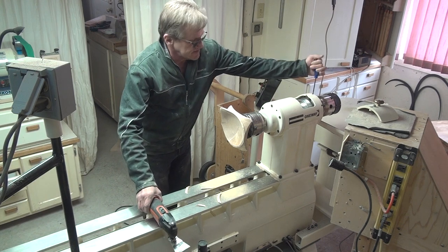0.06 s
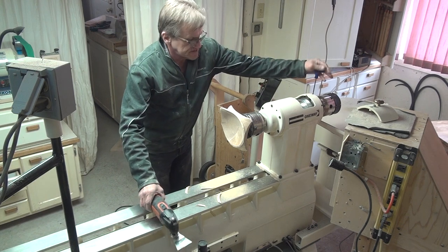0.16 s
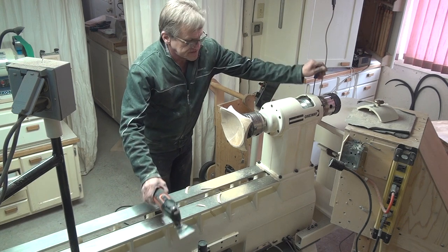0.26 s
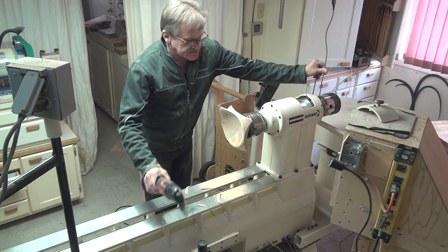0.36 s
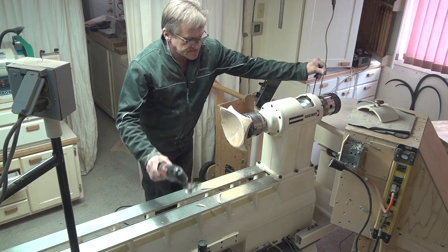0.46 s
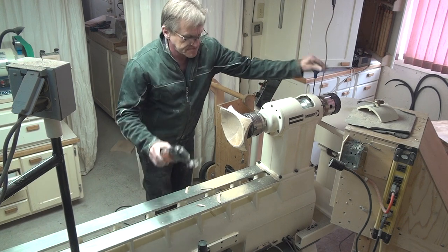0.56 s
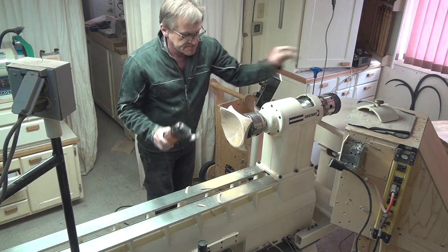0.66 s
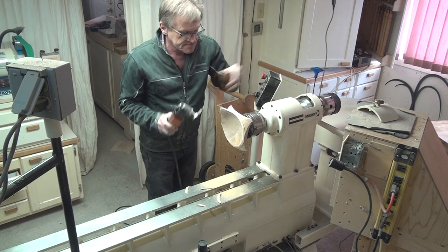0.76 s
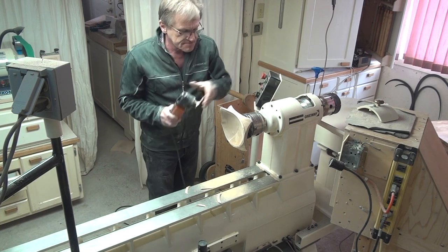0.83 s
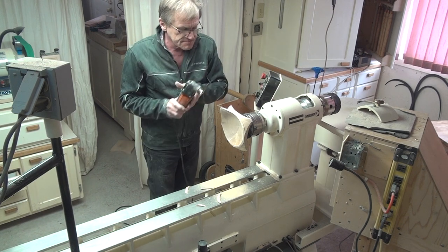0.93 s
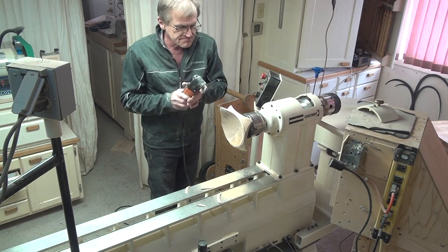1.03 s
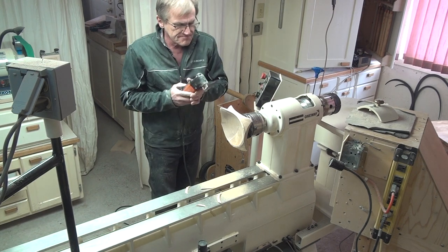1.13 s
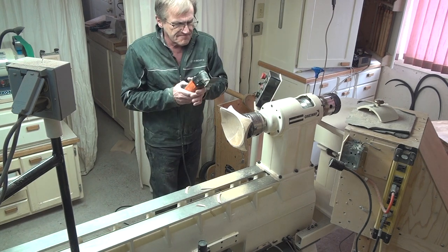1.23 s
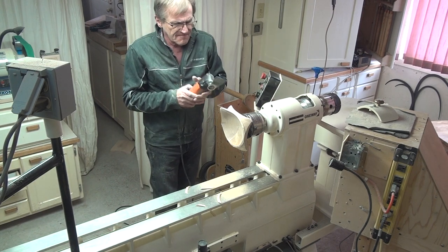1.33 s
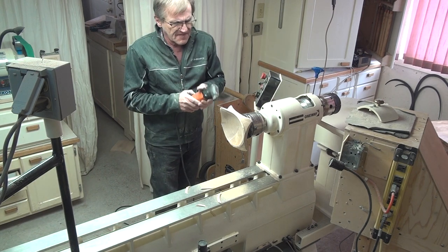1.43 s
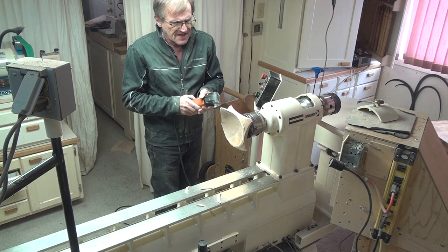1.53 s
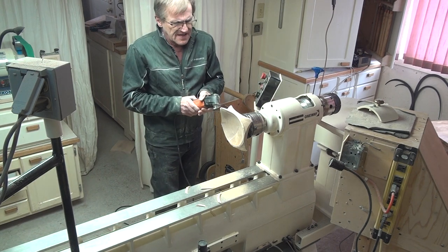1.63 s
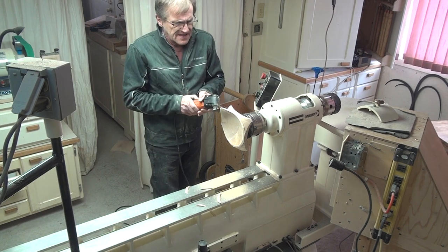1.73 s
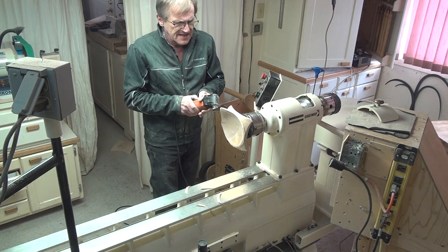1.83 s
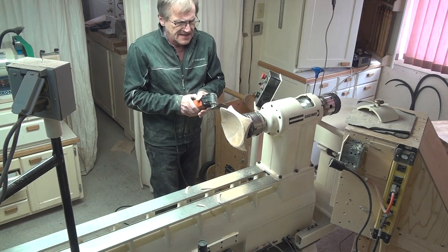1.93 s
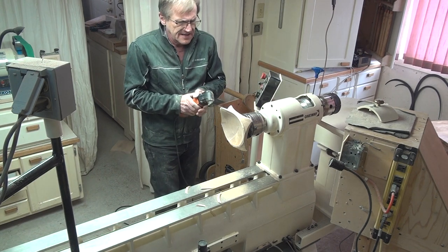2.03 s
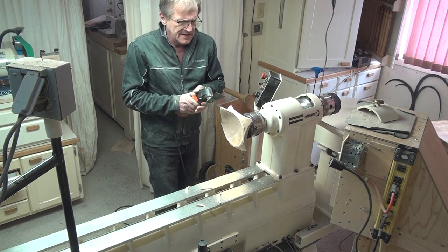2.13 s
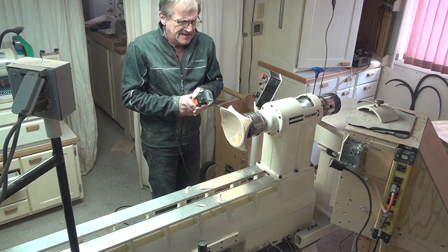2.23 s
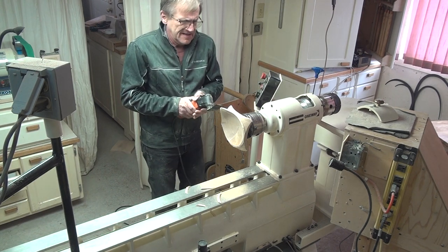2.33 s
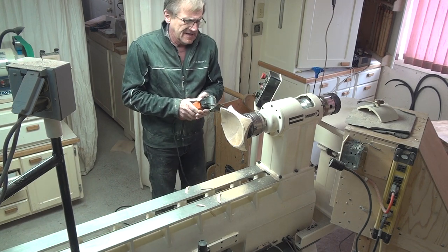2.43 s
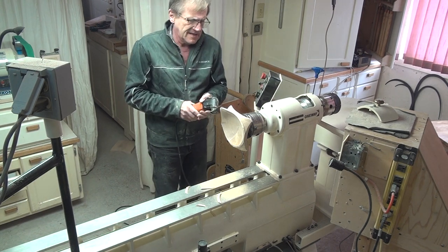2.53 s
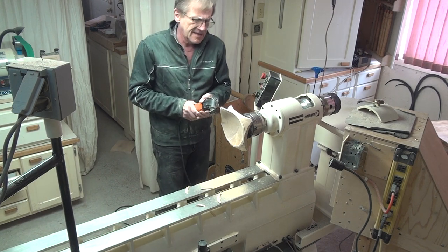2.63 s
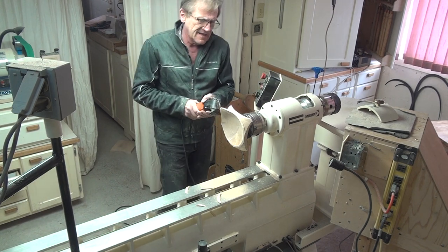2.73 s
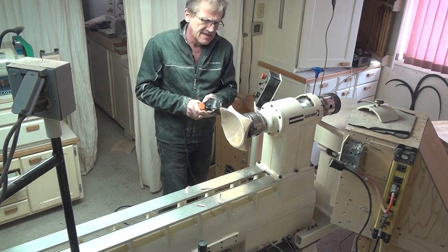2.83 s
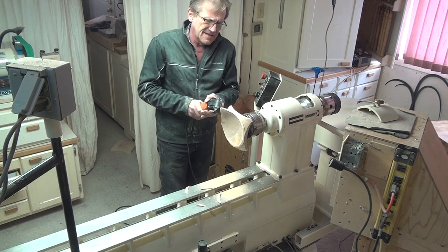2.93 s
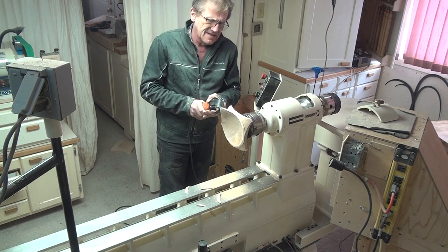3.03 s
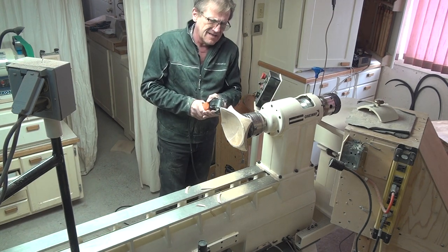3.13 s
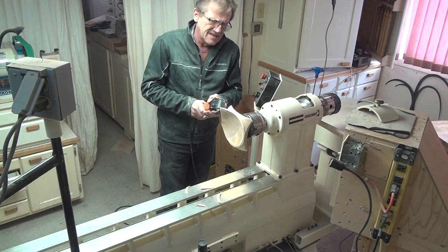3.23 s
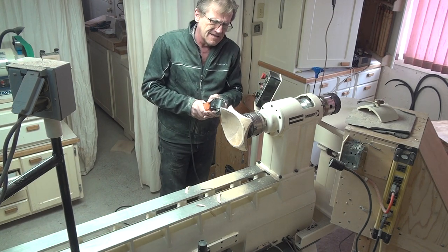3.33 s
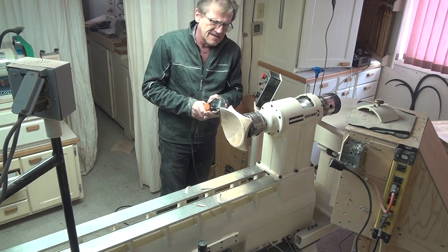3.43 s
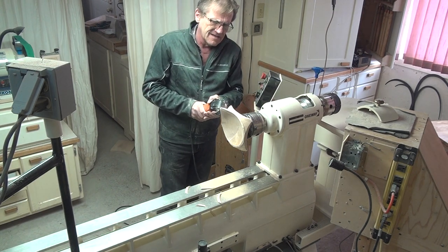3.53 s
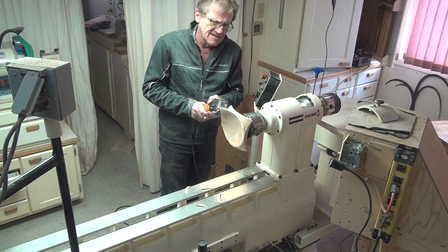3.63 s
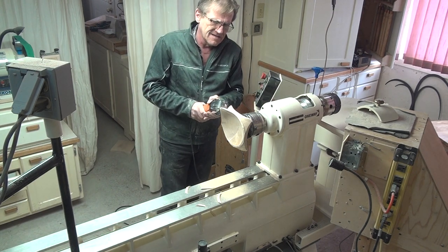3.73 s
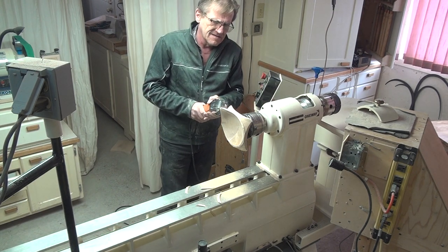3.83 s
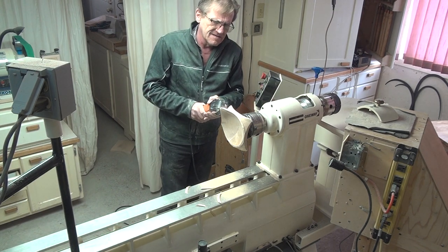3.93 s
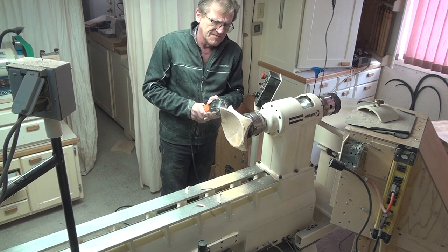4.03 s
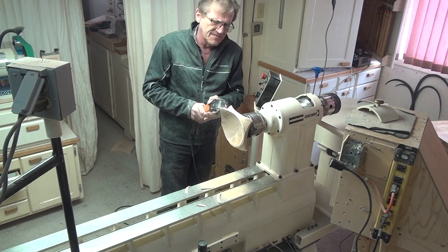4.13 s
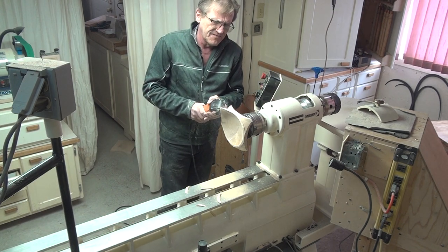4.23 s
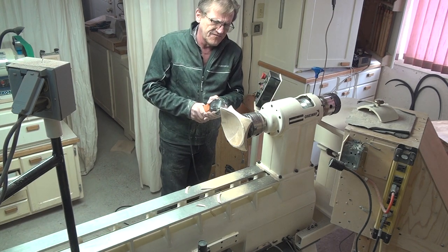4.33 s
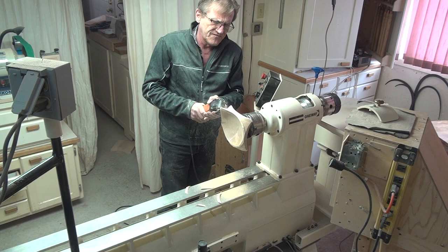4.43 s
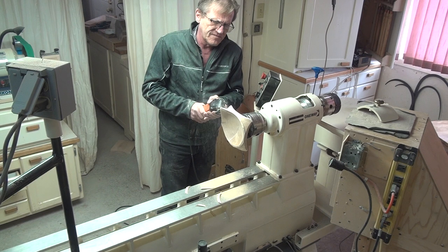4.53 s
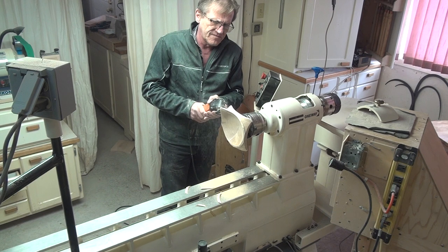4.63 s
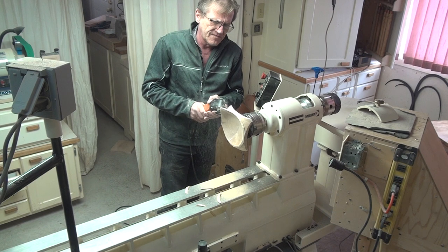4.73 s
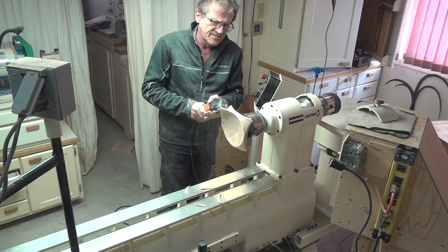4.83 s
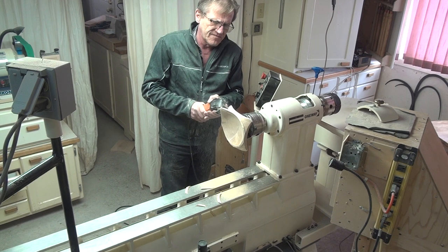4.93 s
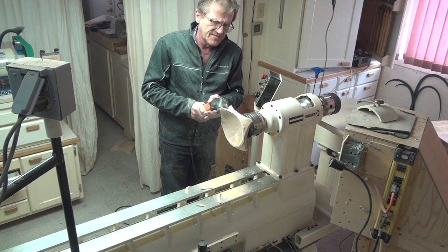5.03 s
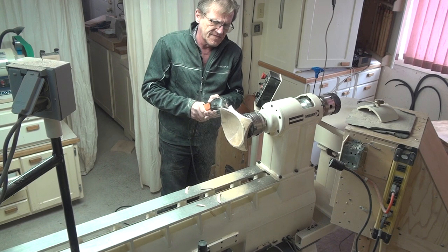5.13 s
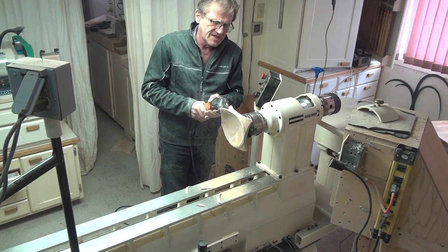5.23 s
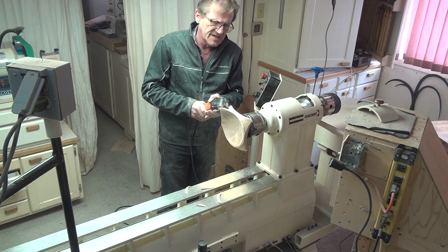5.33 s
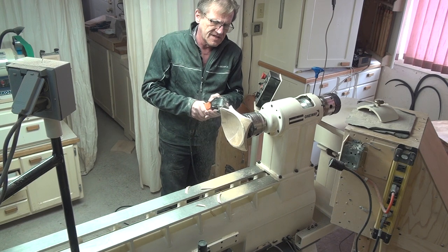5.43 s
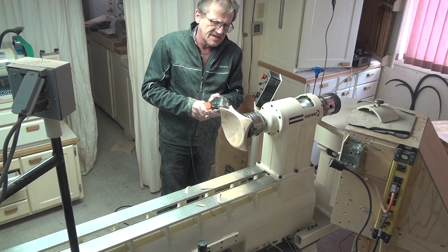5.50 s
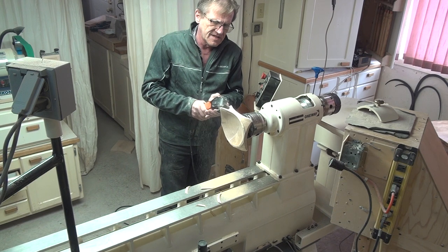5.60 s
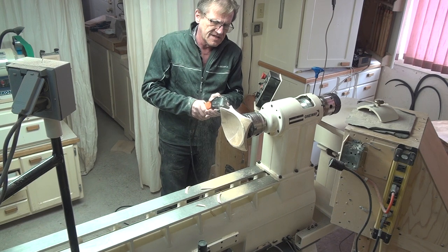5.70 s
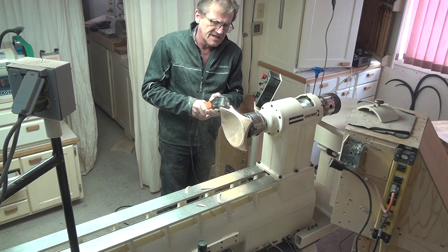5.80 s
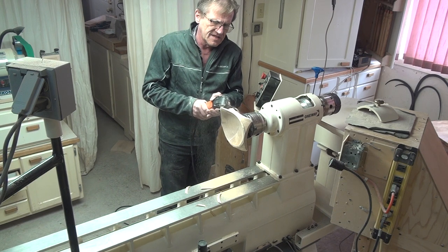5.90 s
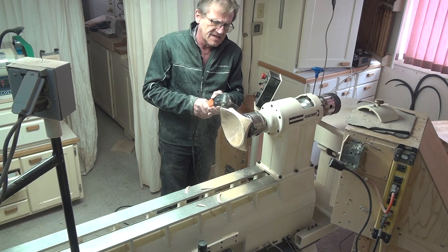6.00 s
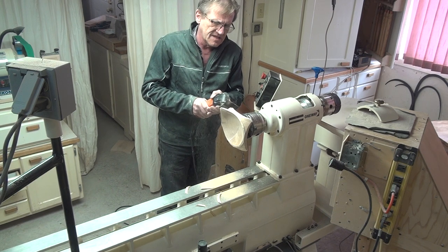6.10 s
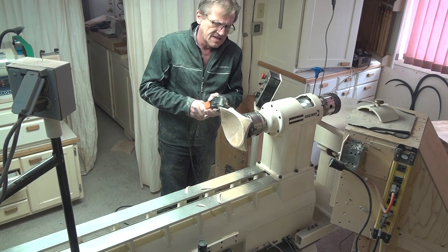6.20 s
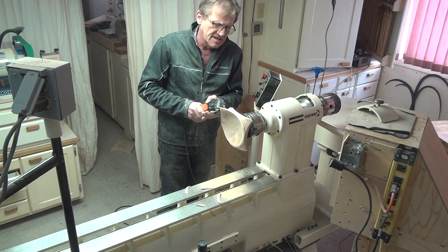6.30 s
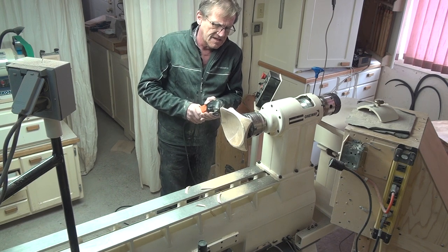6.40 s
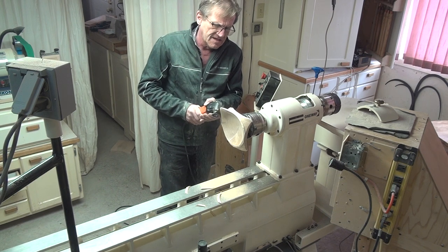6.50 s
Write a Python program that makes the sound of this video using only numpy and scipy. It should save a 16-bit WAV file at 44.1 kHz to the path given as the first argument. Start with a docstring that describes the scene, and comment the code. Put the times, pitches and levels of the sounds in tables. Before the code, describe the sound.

Soft cloth rustle and a few small taps lead to the sharp click of a power tool's switch. The motor starts with a low groan and rises into a rattling, whining buzz. Its oscillating blade bites thin wood with a rasp, slowing under load while the wood resonates, then comes loose with brief metallic zings and speeds back up. The microphone picks up the quick reflections of a small workshop.

```python
"""An oscillating multi-tool bites into a thin turned wooden horn in a small workshop.
First come room tone, cloth rustle and knocks as hands turn the tool and snap its switch on.
The motor groans and rattles up to speed; its reversing blade buzzes under a high rotor whine.
In the cut the teeth skid, the wood rings on a few multiples of the stroke rate and the load
slows the motor, until the blade comes free and the whine rises again."""
import sys
import numpy as np
from scipy import signal
from scipy.fft import rfft, irfft, next_fast_len
from scipy.io import wavfile
from scipy.ndimage import uniform_filter1d

SR = 44100
rng = np.random.default_rng(int(sys.argv[2]) if len(sys.argv) > 2 else 0)


def generate_wav(signal):
    """Clip the signal to [-1, 1] and save it as 16-bit WAV at the path in sys.argv[1]."""
    frames = np.transpose(np.atleast_2d(signal))
    scaled = np.clip(frames, -1, 1) * 32767
    pcm = np.round(scaled).astype(np.int16)
    wavfile.write(sys.argv[1], SR, pcm)


N = 289296
TIME = np.arange(N) / SR


def from_db(db):
    """Decibels to gain."""
    return 10 ** (np.asarray(db) / 20)


def rms_one(x):
    """Scale to rms 1."""
    return x / np.sqrt(np.mean(x ** 2) + 1e-20)


def crossfade(a, b, mix):
    """Linear blend from a (mix 0) to b (mix 1)."""
    return a * (1 - mix) + b * mix


def automation(points):
    """A breakpoint curve at every sample."""
    return np.interp(TIME, *np.transpose(points))


def plateau(start_s, length_s, edge_s):
    """Attack, hold and release, 0-1."""
    return np.clip(np.minimum(TIME - start_s, start_s + length_s - TIME) / edge_s + .5, 0, 1)


def at_hz(points, hz):
    """Read a table on a log-frequency axis."""
    f, value = np.transpose(points)
    return np.interp(np.log(np.maximum(hz, 1)), np.log(f), value)


def drift(rate):
    """Smooth random modulation of rms 1 that changes about `rate` times a second."""
    hop, settle = 40, 2000
    pole = np.exp(-2 * np.pi * rate * hop / SR)
    noise = rng.standard_normal(N // hop + settle + 2)
    slow = signal.lfilter([1], [1, -2 * pole, pole * pole], noise)[settle:]
    return np.interp(np.arange(N) / hop, np.arange(len(slow)), rms_one(slow))


def band(x, low_hz, high_hz, order=2):
    """Causal band-pass."""
    high_hz = min(max(high_hz, low_hz * 1.1), .48 * SR)
    sos = signal.butter(order, [low_hz, high_hz], "band", fs=SR, output="sos")
    return signal.sosfilt(sos, x + 1e-18)


def colour(x, eq):
    """Apply an EQ curve, then scale to rms 1."""
    size = next_fast_len(N)
    gain = from_db(at_hz(eq, np.fft.rfftfreq(size, 1 / SR)))
    return rms_one(irfft(rfft(x, size) * gain, size)[..., :N])


def resonance(x, hz, width_hz):
    """Two-pole resonance with gain 1 at its peak."""
    r = np.exp(-np.pi * width_hz / SR)
    poles = [1, -2 * r * np.cos(2 * np.pi * hz / SR), r * r]
    return signal.lfilter(np.array([1, 0, -1]) * (1 - r * r) / 2, poles, x)


def stereo(mid, side, side_db):
    """Mid and side to a narrow left-right image."""
    return mid + from_db(side_db) * side * np.array([[1], [-1]])


def partial(cycles, multiple, level_db, wander_db, side_db=-16):
    """A tone locked to a cycle count; it wavers as the tool moves through the room's standing waves."""
    phase = 2 * np.pi * (multiple * cycles + rng.random()) + 0.47 * drift(4.0)
    gain = np.sqrt(2) * from_db(level_db + wander_db * drift(5.75))
    return stereo(gain * np.sin(phase), gain * np.cos(phase) * drift(0.91), side_db)


# Workshop reverb: (frequency [Hz], decay time T60 [s])
REVERB_DECAY = [(200, 0.35), (1000, 0.25), (3000, 0.28), (8000, 0.26), (15000, 0.13)]


def room(x, wet_db):
    """Direct sound plus dense reflections from near benches and walls, dying faster in the treble."""
    t = np.arange(SR // 2) / SR
    edges_hz = np.geomspace(100, 17000, 9)
    tail = 0
    for low, high in zip(edges_hz, edges_hz[1:]):
        t60 = at_hz(REVERB_DECAY, np.sqrt(low * high))
        tail += band(rng.standard_normal((2, len(t))), low, high) * from_db(-60 * t / t60)
    tail *= np.clip(t / 0.0014, 0, 1)
    mid, side = tail / np.sqrt(np.sum(tail ** 2, axis=1, keepdims=True))
    wet = signal.fftconvolve(x[None], stereo(mid, side, side_db=-14), axes=1)[:, :N]
    return x + from_db(wet_db) * wet


# Colour of the air: (frequency [Hz], gain [dB])
AIR_EQ = [(15, -60), (25, -49), (123, -30), (149, -6), (180, -18.5), (285, -16), (734, -0.5), (840, -3.5),
          (988, -3), (1520, -0.5), (6380, -12.5), (11000, -19), (16000, -29)]
# Mains hum: (frequency [Hz], pre-fader level [dB])
HUM_TONES = [(120, -78.5), (179.8, -59), (240, -77), (300, -82), (480, -73.5), (840, -69.5)]
# Fader on air and hum, sinking from the switch snap on: (time [s], gain [dB])
ROOM_TONE_FADER = [(0, 3), (2.195, 2.5), (2.205, 0), (2.9, -15.5), (6.56, -23.5)]


def room_tone():
    """Air noise, the hum of mains equipment and a low rumble that swells while the tool is worked."""
    air = from_db(-53) * colour(stereo(*rng.standard_normal((2, N)), side_db=-8.5), AIR_EQ)
    working = plateau(start_s=2.83, length_s=2.9, edge_s=.2)
    rumble_gain = np.hypot(from_db(-78), working * from_db(-69))
    rumble = rms_one(band(stereo(*rng.standard_normal((2, N)), side_db=-23), 20, 200, order=1))
    hum = sum(np.sqrt(2) * from_db(db) * np.sin(2 * np.pi * (hz * TIME + rng.random()))
              for hz, db in HUM_TONES)
    return (air + hum) * from_db(automation(ROOM_TONE_FADER)) + rumble_gain * rumble


# Arm and hand moves: (peak time [s], half length [s], relative rustle [dB], relative sleeve hiss [dB])
HAND_MOVES = [(.03, .12, -50.5, -58), (0.256, 0.11, -56, -52), (0.77, 0.11, -44, -52),
              (1.066, 0.15, -39, -40.5), (1.428, 0.16, -41, -41.5), (1.754, 0.048, -44, -49),
              (2.008, 0.042, -40, -35.5), (2.098, 0.051, -45, -42)]
# Colour of rubbing cloth: (frequency [Hz], gain [dB])
CLOTH_EQ = [(120, -29), (200, -5), (254, -13), (473, -3), (548, -7), (821, -2.5), (1560, -8), (1740, -3),
            (3130, -1), (5940, -5.5), (9930, -7), (16000, -12)]
# Airy hiss of the sleeves: (frequency [Hz], gain [dB])
SLEEVE_EQ = [(3000, -16), (6000, -6), (8000, 0.5), (10500, 3), (13000, -3), (16000, -7.5)]


def rustle(grain_db=2.0, scuff_s=2.052, settle_s=2.202):
    """Cloth rubs in small clumps and a palm scuffs the housing, until the hands settle on the switch."""
    cloth_gain, sleeve_gain = from_db(-55), from_db(-53.5)   # floor between moves
    for peak_s, half_s, rustle_db, hiss_db in HAND_MOVES:
        move = np.exp(-.5 * ((TIME - peak_s) / half_s) ** 2)
        cloth_gain = np.hypot(cloth_gain, move * from_db(rustle_db))
        sleeve_gain = np.hypot(sleeve_gain, move * from_db(hiss_db))
    clumps = rng.standard_normal((3, N)) * from_db(grain_db * drift(85))
    cloth = cloth_gain * rms_one(band(colour(clumps[0], CLOTH_EQ), 180, 6150))
    sleeves = from_db(-3.5) * sleeve_gain * colour(clumps[1], SLEEVE_EQ)
    scuff_db = -29.5 - np.maximum(850 * (scuff_s - TIME), 142 * (TIME - scuff_s))   # fast in, slower out
    skin = colour(clumps[2], eq=[(250, 2.5), (1000, -1.5), (2800, -4.5), (6000, -17)])
    palm = from_db(scuff_db) * rms_one(band(skin, 390, 5400))
    moving = np.clip((settle_s - TIME) / .004, 0, 1)
    return room(from_db(-3.5) * (cloth + sleeves + palm), wet_db=-1.5) * moving


# Hand knocks and switch snaps:
# (time [s], relative level [dB], low cut [Hz], high cut [Hz], contact decay [s], shell send [dB])
HANDLING_HITS = [(0.09, -31.5, 500, 1500, 0.003, -26), (0.463, -35.5, 1500, 7000, 0.0043, -14),
                 (0.802, -26, 550, 1190, 0.0038, -22.5), (0.842, -31, 600, 1300, .005, -30),
                 (0.910, -22, 300, 1300, 0.0034, -30), (0.929, -24.5, 280, 700, .004, -30),
                 (1.069, -20, 281, 1270, 0.0034, -21), (1.072, -20, 2020, 3170, 0.0023, -19),
                 (1.090, -30, 2000, 3600, 0.0027, -24), (1.2854, -11, 1000, 3400, 0.0013, -13),
                 (1.2866, -16, 1100, 1500, .004, -30), (1.452, -26, 1500, 3550, 0.0035, -23),
                 (1.586, -21.5, 1380, 6900, 0.0014, -14), (1.666, -26, 890, 1500, 0.0024, -7),
                 (1.989, -11, 1280, 4500, 0.0036, -7.5), (2.082, -13.5, 1800, 4700, 0.0011, -13),
                 (2.2256, -20, 1800, 9000, 0.0022, -30), (2.2274, -6, 1770, 11000, 0.0016, -14),
                 (2.2283, -12, 2020, 3640, 0.0021, -26), (2.229, -21.5, 520, 1300, 0.0021, -19),
                 (3.225, -16.5, 600, 1340, 0.013, -33), (3.255, -21, 557, 1320, 0.013, -25)]
# Ring of the plastic shell: (frequency [Hz], relative level [dB], decay time T60 [s])
SHELL_MODES = [(1190, -21, 0.15), (1315, -14, 0.06), (1544, -6.5, 0.052), (2195, -2, 0.029),
               (2820, -5, 0.037), (3570, -14, .03), (4000, -9, 0.033), (4823, -31, .03)]


def knocks(ring_db=-8):
    """Short crunches, dull for a palm and bright for the switch, set the shell ringing."""
    out, t = np.zeros(N + SR), np.arange(SR // 5) / SR
    for time_s, level_db, low_hz, high_hz, contact_s, send_db in HANDLING_HITS:
        crunch = band(rng.standard_normal(len(t)) * np.exp(-t / contact_s), low_hz, high_hz, order=3)
        crunch /= np.sqrt(np.sum(crunch ** 2) / (0.00026 * SR))   # equal energy for every crunch
        shell = sum(from_db(db - 60 * t / t60) * np.sin(2 * np.pi * hz * t) * rng.choice([-1, 1])
                    for hz, db, t60 in SHELL_MODES)
        start = round(time_s * SR)
        out[start:start + len(t)] += from_db(level_db) * (crunch + from_db(send_db + ring_db) * shell)
    return room(band(out[:N], 190, 19000), wet_db=-1.5)   # the knocks carry nothing below about 190 Hz


# Drone of the motor's frame: (frequency [Hz], pre-fader level [dB])
FRAME_TONES = [(240, -73), (360, -66), (482, -55.5), (602, -59.5), (843, -51), (1082, -53)]
# Swell of the start-up groan: (time [s], gain [dB])
GROAN_FADER = [(2.3, -29), (2.38, -10), (2.45, -3.5), (2.53, 4), (2.8, 5.5), (2.95, -15), (3.1, -57)]


def groan(brush_hz=3000, brush_width_hz=440):
    """The soft start feeds the motor in mains-rate gulps: its frame drones while the brushes chafe."""
    swell_db = automation(GROAN_FADER)
    drone = sum(partial(TIME + 0.005 * drift(27) / np.sqrt(hz), hz, db + swell_db, wander_db=5.0)
                for hz, db in FRAME_TONES)
    brushes = resonance(rng.standard_normal(N), brush_hz, brush_width_hz)
    brushes = rms_one(resonance(brushes, brush_hz, brush_width_hz))
    return drone + from_db(swell_db - 49) * brushes


CONTACT_S, ENTRY_S = 3.226, 0.048   # the teeth touch the wood and take this long to enter
FREE_HZ, FULL_BUZZ_HZ = 282.2, 245   # stroke rates: with no load, and where the tones reach full level
# Pitch curve of the tool through spin-up, load and release: (time [s], stroke rate [Hz])
STROKE_RATE = [(2.8, 157.3), (2.9, 213.6), (2.95, 232.0), (3.03, 257.1), (3.11, 270.0), (3.2, 276.0),
               (3.35, 276.9), (3.61, 268.9), (3.75, 262.2), (4.77, 252.3), (5.11, 251.7), (5.75, 256.2),
               (5.93, 260.6), (6.0, 270.1), (6.11, 276.7), (6.56, 281.8)]


def motor(start_s=2.38, inertia_s=0.11, full_sag_hz=31.4, full_surge_hz_per_s=454):
    """Speed, surge (how hard it picks up) and bite (0-1, speed lost to the wood and not being regained)."""
    speed = automation([(start_s, 0)] + list(STROKE_RATE))
    pickup = uniform_filter1d(np.gradient(speed) * SR, size=5200)
    entered = np.clip((TIME - CONTACT_S) / ENTRY_S, 0, 1)
    bite = entered * np.clip((FREE_HZ - speed - inertia_s * pickup) / full_sag_hz, 0, 1)
    shudder = 0.37 * np.exp(-((speed - 179) / 57) ** 2)   # the body shakes on the way through 179 Hz
    surge = np.maximum(pickup / full_surge_hz_per_s, 0) + shudder
    return speed, surge, bite


def decades_below(speed, full_hz):
    """How far the speed is under a given rate: log ratio, at most 0."""
    return np.log10(np.clip(speed / full_hz, .01, 1))


# Honk of the housing: (frequency [Hz], bandwidth [Hz], gain [dB])
HOUSING_MODES = [(1300, 150, -28), (3270, 160, -12), (4050, 210, -2)]
# Rattle colour during spin-up: (frequency [Hz], gain [dB])
SPIN_UP_EQ = [(100, -49), (250, -34), (400, -23), (600, -12.5), (900, -7.5), (1400, 1.5), (2200, 0.5),
              (3000, 0.5), (4200, -6), (6000, -10.5), (8500, -22), (11500, -21), (14000, -36.0),
              (16000, -40.0)]
# Colour of the hiss, and of the rattle at speed: (frequency [Hz], gain [dB])
RUNNING_EQ = [(100, -46), (250, -27.5), (400, -24), (600, -11), (900, -6.5), (1400, -5), (2200, -2),
              (3000, 2), (4200, -6.0), (6000, -15), (8500, -17), (11500, -15.5), (14000, -28.5),
              (16000, -31)]


def rattle(strokes, speed, surge, bite, sharpness=0.89, uneven_db=3.5):
    """At each reversal the drive knocks and the teeth scrape: bursts of noise through the housing."""
    # The noise grows with speed and torque; the wood damps it.
    decades = decades_below(speed, FREE_HZ)
    body_db = -38 + 18 * decades + 9 * surge - 7 * bite + .5 * drift(12)
    hiss_db = -44 + 23 * decades + 6.5 * surge - 3.5 * bite + .5 * drift(12)
    for start_s, length_s, _, body_boost_db, hiss_boost_db in SKID_CUES:
        skidding = plateau(start_s, length_s, SKID_EDGE_S)
        body_db += body_boost_db * skidding
        hiss_db += hiss_boost_db * skidding
    pulses = np.exp(sharpness * np.cos(2 * np.pi * strokes) + .5 * np.cos(4 * np.pi * strokes))
    gate = pulses * from_db(uneven_db * drift(120)) * (speed > 0)
    bursts = gate * rng.standard_normal(N)
    bursts += sum(from_db(db) * resonance(bursts, hz, width) for hz, width, db in HOUSING_MODES)
    at_speed = np.clip((speed - 200) / 55, 0, 1)
    clatter = crossfade(colour(bursts, SPIN_UP_EQ), colour(bursts, RUNNING_EQ), at_speed)
    body = from_db(body_db) * rms_one(band(clatter, 110, 6200, order=3))
    scrape = colour(gate * rng.standard_normal(N), RUNNING_EQ)
    hiss = from_db(hiss_db) * rms_one(band(scrape, 4960, 15400, order=3))
    return room(body + hiss, wet_db=4.5)


# Buzz spectrum, read at whole orders: (order [x stroke rate], free gain [dB], cutting gain [dB])
BUZZ_SPECTRUM = [(0.99, -56.5, -59), (1.99, -67, -54.5), (3.05, -41, -37.5), (3.98, -42, -37),
                 (5.92, -39.5, -41.5), (7, -42.5, -34.5), (8, -34, -41), (10.3, -41, -35.5),
                 (11, -33.5, -31.5), (12.07, -33.5, -36), (14, -46, -43), (14.6, -43, -42.5),
                 (16, -56, -46), (17, -53, -41.5), (18, -49, -50.5), (18.3, -55, -40.5), (21.2, -50, -44.5),
                 (22.4, -55, -47.5), (24.6, -80, -52.5), (27, -57, -52), (29.4, -75.5, -47), (34, -64, -55),
                 (40.8, -59, -63), (50, -74, -82)]
# Bearing tones between the orders: (pitch [x stroke rate], free gain [dB], cutting gain [dB])
BEARING_TONES = [(5.43, -61, -62), (6.43, -47, -60), (7.43, -46, -55), (8.57, -42.5, -44), (9.43, -48, -59),
                 (11.43, -46, -47), (12.57, -47.5, -41.5)]
# The hand presses and eases: (time [s], gain [dB])
BUZZ_FADER = [(3.05, 0.5), (3.85, -1), (4.25, -2), (4.42, 1.5), (4.8, -3.5), (5.4, 2.5), (5.62, -1),
              (5.8, 1.5), (5.96, -3), (6.25, 1), (6.56, -0.5)]


def buzz(strokes, speed, bite, clamp_hz=255.3, scratch_hz=7700):
    """The reversing blade shakes out a stack of orders that shifts as it bites; the bearings sing along."""
    clamped = bite * np.clip((clamp_hz - speed) / 2.9, 0, 1)   # the cut grips the dragging blade
    bass_db = 2 - 10.5 * clamped + 45 * decades_below(speed, FULL_BUZZ_HZ)   # the bass comes in last
    fader_db = automation(BUZZ_FADER)
    # The teeth scratch on entering, less as the groove deepens.
    cut_s = TIME - CONTACT_S
    scratch_db = np.clip(cut_s / ENTRY_S, 0, 1) * np.maximum(18 - 13 * cut_s, -3.5)
    orders, free_db, cut_db = np.transpose(BUZZ_SPECTRUM)
    out = np.zeros((2, N))
    for k in range(1, 51):
        if k in RING_ORDERS + WHINE_ORDERS:
            continue
        order_db = crossfade(np.interp(k, orders, free_db), np.interp(k, orders, cut_db), bite)
        order_db += 8.4 * bite * (1 - bite) * drift(16)   # a half-engaged blade chatters
        order_db += scratch_db * np.exp(-((k * speed - scratch_hz) / 1400) ** 2)
        if k <= 3:
            order_db += bass_db
        out += partial(strokes, k, fader_db + order_db, wander_db=1.5 if k <= 3 else 3.5)
    for k, free, cut in BEARING_TONES:
        out += partial(strokes, k, fader_db + crossfade(free, cut, bite) + 2.5, wander_db=3.0)
    return out


WHINE_ORDERS = (20, 40, 60)
# Motor whine, a row per order: (free gain [dB], cutting gain [dB], change at full surge [dB])
WHINE_MIX = [(-33, -49, -4.5), (-39, -48.5, 3), (-65, -63, 22)]


def whine(rotor, surge, bite):
    """Rotor slots and cooling fan whistle far above the stroke rate."""
    out = 0
    for k, (free_db, cut_db, surge_db) in zip(WHINE_ORDERS, WHINE_MIX):
        level_db = crossfade(free_db, cut_db, bite) + surge_db * surge + 2.4 * drift(22)
        out += partial(rotor, k, level_db, wander_db=3.5, side_db=-12.5)
    return out


RING_ORDERS = (5, 9, 13)
# Ring of blade and wood, a row per order: (free gain [dB], cutting gain [dB], change in a skid [dB])
RING_MIX = [(-34.5, -27.5, -3), (-35, -26.5, 1), (-40, -32.5, -2)]
# Resonances of the horn's wall: (frequency [Hz], bandwidth [Hz], boost at full bite [dB])
WALL_MODES = [(1309, 31.4, 9.5), (2259, 39, 8), (2438, 39, 10), (3349, 108, 8)]


def ringing_wood(strokes, speed, bite):
    """Blade and thin wooden wall sing on a few orders, each swelling as it slides onto a wall mode."""
    out = 0
    skidding = sum(plateau(start_s, length_s, SKID_EDGE_S) for start_s, length_s, *_ in SKID_CUES)
    for k, (free_db, cut_db, skid_db) in zip(RING_ORDERS, RING_MIX):
        boost_db = sum(db / (1 + (2 * (k * speed - hz) / width) ** 2) for hz, width, db in WALL_MODES)
        level_db = crossfade(free_db, cut_db, bite) + np.sqrt(bite) * boost_db + skid_db * skidding
        out += partial(strokes, k, level_db, wander_db=2.6, side_db=-14)
    return out


SKID_EDGE_S = 0.086   # fade in and out
# The teeth skid on the wall as they enter and break through:
# (start [s], length [s], relative blade ring [dB], rattle boost [dB], hiss boost [dB])
SKID_CUES = [(3.15, 0.15, -58, 4.5, 3.5), (3.263, 0.33, -41, 1, 3.5), (5.28, .2, -39.5, 2.5, 5),
             (5.66, 0.26, -36.5, 3, 0), (6.456, 0.055, -58, 3, 5)]
# Zing of the steel blade: (frequency [Hz], bandwidth [Hz])
BLADE_MODES = [(4400, 1100), (4950, 240), (5750, 100)]


def skid(strokes, speed, uneven_db=2.5, grit=.12):
    """Once a stroke the teeth slip with uneven force and set the steel blade ringing."""
    slips = np.diff(np.floor(strokes), prepend=0) * from_db(uneven_db * drift(90)) * (speed > 0)
    force = slips * np.sqrt(SR / np.maximum(speed, 100)) + grit * rng.standard_normal(N)
    ring = sum(resonance(force, hz, width) for hz, width in BLADE_MODES)
    pressure = sum(from_db(ring_db) * plateau(start_s, length_s, SKID_EDGE_S)
                   for start_s, length_s, ring_db, _, _ in SKID_CUES)
    return room(from_db(-6) * pressure * rms_one(ring), wet_db=9)


def scene():
    """One speed curve drives buzz, whine, ring and rattle, mixed with groan, handling and room tone."""
    speed, surge, bite = motor()
    rotor = np.cumsum(speed * (1 + 0.00042 * drift(12.7) + 0.0017 * drift(157))) / SR
    # Play in the linkage lets the blade lag unevenly, most of all during spin-up.
    slack = .0012 + .0015 * (1 - bite) + .008 * np.clip((240 - speed) / 40, 0, 1)
    strokes = rotor + slack * drift(78)
    radiated = from_db(64 * decades_below(speed, FULL_BUZZ_HZ))   # a slow blade hardly radiates
    tones = buzz(strokes, speed, bite) + whine(rotor, surge, bite) + ringing_wood(strokes, speed, bite)
    tool = radiated * tones + groan() + rattle(strokes, speed, surge, bite) + skid(strokes, speed)
    balance = from_db([[-.2], [.2]])
    return (tool + knocks() + rustle() + room_tone()) * balance


def record(dry):
    """A steep low-pass takes off the very top."""
    return signal.sosfilt(signal.ellip(12, .1, 80, 15850, fs=SR, output="sos"), dry)


dry = scene()
out = record(dry)
generate_wav(out)
```